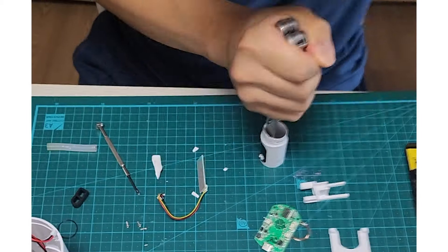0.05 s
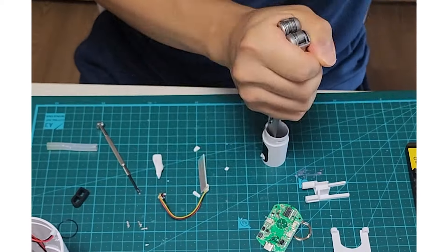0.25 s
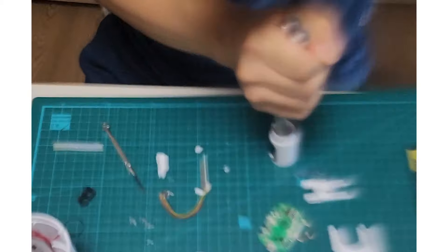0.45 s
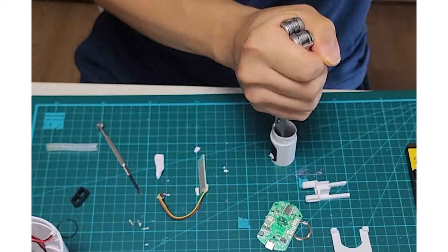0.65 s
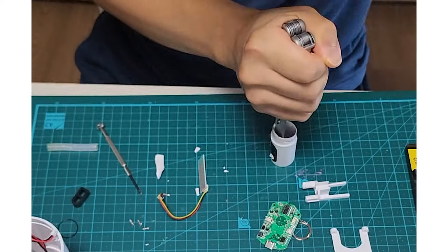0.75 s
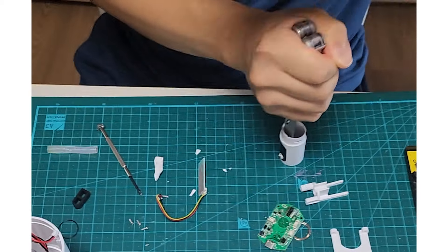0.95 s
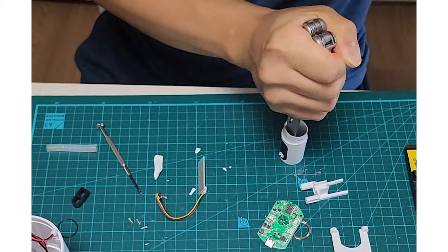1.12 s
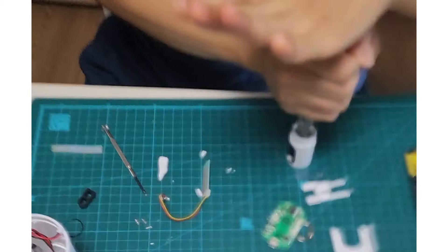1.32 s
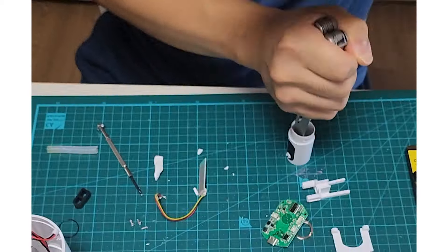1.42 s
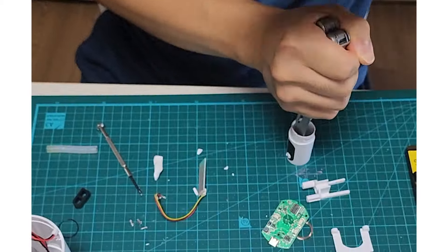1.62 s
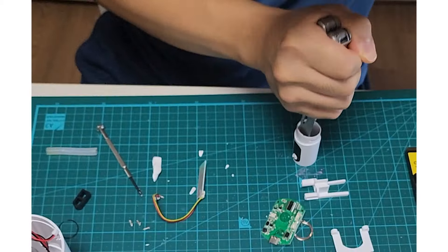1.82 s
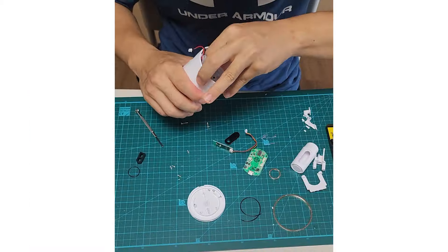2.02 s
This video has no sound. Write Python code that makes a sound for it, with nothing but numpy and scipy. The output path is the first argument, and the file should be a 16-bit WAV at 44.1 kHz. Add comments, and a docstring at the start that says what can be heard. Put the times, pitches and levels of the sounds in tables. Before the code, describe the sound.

A palm hammers five times, at an even pace, on a steel tool standing in a small plastic housing. Each blow combines a slap, a hollow knock, a deep desk thump and a crunchy snap of plastic, followed by a quick clatter of loose parts. Faint ticks fall between the later blows. Finally the background drops away and fingers briefly slide on plastic. The stereo microphone is close to the desk in a bare, echoing room.

```python
"""A bare, echoing room, stereo microphone close to a desk with a mat on it.
A palm hammers five times on a steel tool that stands in a small plastic housing on the mat.
Each blow slaps the handle, thumps the desk and cracks the plastic; tool and loose parts jump and
clatter down again. The recorder's limiter ducks under the thumps. At the end the room's sound
drops away and fingers slide on the plastic."""
import sys
import numpy as np
from scipy import signal
from scipy.fft import rfft, irfft, next_fast_len
from scipy.io import wavfile
from scipy.ndimage import uniform_filter1d, minimum_filter1d

SR = 44100
rng = np.random.default_rng(int(sys.argv[2]) if len(sys.argv) > 2 else 0)


def output_pcm(signal):
    """Save a mono or channel-first signal as 16-bit PCM at the path in sys.argv[1].

    Samples are clipped to [-1, 1] before scaling.
    """
    pcm = np.clip(np.atleast_2d(signal).T, -1, 1) * 32767
    wavfile.write(sys.argv[1], SR, np.round(pcm).astype(np.int16))


N = 91419
SCENE_S = np.arange(N) / SR
RING_S = np.arange(int(0.66 * SR)) / SR  # time axis of one ring or echo


def amp(db):
    """Decibels to gain."""
    return 10 ** (np.asarray(db) / 20)


def unit_rms(x):
    """The signal scaled to rms 1."""
    return x / np.sqrt(np.mean(x ** 2) + 1e-20)


def curve_at(points, hz):
    """Read (hz, value) points on a log frequency axis."""
    point_hz, values = np.transpose(points)
    return np.interp(np.log(hz + 1), np.log(point_hz + 1), values)


def add(track, start_s, sound):
    """Mix a sound into the track from start_s on."""
    start = round(start_s * SR)
    part = sound[..., max(-start, 0):max(track.shape[-1] - start, 0)]
    track[..., max(start, 0):max(start, 0) + part.shape[-1]] += part


# How alike the microphone's two sides are: frequency_hz, correlation
STEREO_LIKENESS = [(60, 0.99), (150, 1), (300, 0.95), (640, 0.73), (1400, 0.27), (16000, 0)]

def noise(size, spectrum=None, tilt=0):
    """Stereo noise of rms 1, alike in the bass and unrelated in the treble; tilt in dB per octave."""
    fft_size = next_fast_len(size)
    hz = np.fft.rfftfreq(fft_size, 1 / SR)
    spread = np.arccos(np.clip(curve_at(STEREO_LIKENESS, hz), -1, 1)) / 2
    colour = amp(curve_at(spectrum, hz) + tilt * np.log2(hz + 150)) if spectrum else 1
    white = rfft(rng.standard_normal((2, fft_size)))
    mid, side = irfft(white * colour * [np.cos(spread), np.sin(spread)], fft_size)[:, :size]
    return unit_rms(np.array([mid + side, mid - side]))


def burst(spectrum, tilt, t60_s, grain_db, rise_s):
    """A contact: dense, quickly damped ringing, broken into grains about a millisecond long."""
    t = RING_S[:SR // 10]
    grain_s = t[::SR // 1000]
    grains = unit_rms(amp(grain_db * np.interp(t, grain_s, rng.standard_normal(len(grain_s)))))
    envelope = amp(-60 * t / t60_s) * (1 - np.exp(-t / rise_s))
    return noise(len(t), spectrum, tilt) * grains * envelope


def ring(modes, attack_s):
    """Damped modes; heard away from the struck point, neighbours start in opposite directions."""
    swings = [(-1) ** k * amp(db - 60 * RING_S / t60_s) * np.sin(2 * np.pi * hz * RING_S)
              for k, (hz, db, t60_s) in enumerate(modes)]
    return -sum(swings) * (1 - np.exp(-RING_S / attack_s))


# How long the bare room echoes: frequency_hz, t60_s
ROOM_DECAY = [(80, 0.41), (210, 0.83), (560, 0.61), (1470, 0.55), (3880, 0.42), (10200, 0.42),
              (16000, 0.33)]
# Bands the room favours: frequency_hz, gain_db
ROOM_COLOUR = [(180, 0), (260, -31.5), (350, 1), (480, 4.5), (650, -4), (800, 8), (1000, 2), (1300, 0),
               (2000, -1), (16000, 0)]
# First wall reflection at the microphone: left_delay_s, right_delay_s, gain_db
WALL_REFLECTION = [(0.0124, .0146, -12.5)]

def in_room(sound, wet_db):
    """The direct sound, a wall reflection, and a diffuse tail whose treble dies first."""
    hz, t, bands = signal.stft(noise(len(RING_S)), SR, nperseg=512)
    fading = amp(curve_at(ROOM_COLOUR, hz)[:, None] - 60 * t / curve_at(ROOM_DECAY, hz)[:, None])
    tail = signal.istft(bands * fading, SR, nperseg=512)[1][:, :len(RING_S)]
    tail *= 1 + np.tanh((RING_S - 0.010) / 0.006)  # reflections take a moment to pile up
    response = amp(wet_db) * tail / np.linalg.norm(tail[0])
    response[:, 0] += 1  # direct path
    for left_s, right_s, db in WALL_REFLECTION:
        response[[0, 1], [round(left_s * SR), round(right_s * SR)]] += amp(db)
    return signal.fftconvolve(sound, response, axes=1)


# The five blows, close to the microphone:
# start_s, slap_db, knock_db, thump_db, boom_db, clack_db, bite_db, flight_s, clatter_db
PALM_BLOWS = [(-0.005, -11.5, -16, -2, -4, -13.5, -18, 0.04, -22),
              (0.4190, -15, -8, 6.5, 7, -9.5, -4.5, 0.053, -15),
              (0.8759, -5, -5.5, 8.5, 4.5, -13.5, -8.5, 0.049, -15),
              (1.3144, -7, -12, 5.5, 3, -11.5, -11.5, 0.053, -13.5),
              (1.7482, -10.5, -22, 7.5, -7.5, -15.5, -11.5, 0.052, -15.5)]
BLOW_S, SLAP_DB, KNOCK_DB, THUMP_DB, BOOM_DB, CLACK_DB, BITE_DB, FLIGHT_S, CLATTER_DB = zip(*PALM_BLOWS)
# Palm on the handle: frequency_hz, density_db
SLAP_SPECTRUM = [(100, -7), (400, 3), (900, -7.5), (1450, 6.5), (2000, -8.5), (3000, -6), (4600, -4.5),
                 (7300, -10.5), (11000, -18.5), (16000, -8.5)]
# The hollow housing under the tool: pitch_hz, level_db, t60_s
HOUSING_MODES = [(1414, -2.5, 0.021), (2880, -31, 0.013), (4600, -27, 0.0098)]

def palm_slaps():
    """The palm slaps the end of the tool, and the housing below gives a hollow knock."""
    out = np.zeros((2, N))
    knock = np.tile(ring(HOUSING_MODES, attack_s=0.0003)[:SR // 10], (2, 1))
    for start_s, slap_db, knock_db in zip(BLOW_S, SLAP_DB, KNOCK_DB):
        slap = burst(SLAP_SPECTRUM, tilt=-2.25, t60_s=0.027, grain_db=2, rise_s=0.00059)
        add(out, start_s, amp(slap_db) * in_room(slap, wet_db=-1))
        add(out, start_s, amp(knock_db) * in_room(knock, wet_db=-6.5))
    return out


# Standing waves of the room, heard at the desk: pitch_hz, level_db, t60_s
ROOM_MODES = [(123.6, -26, 0.47), (150.13, -22, 0.56), (166.5, -18, 0.36), (201.7, -33, 0.64),
              (346.3, -30, 0.62), (468, -42.5, 1), (574, -44.5, 0.75), (773, -40, 0.73), (822, -42, 0.94),
              (1200, -28, 0.51), (1375, -44, 0.32), (1580, -31, 0.31)]
# Woody clack of the desk board: frequency_hz, density_db
BOARD_SPECTRUM = [(120, -13), (220, 13.5), (340, 1), (460, 0.5), (570, 3), (800, -5), (1200, -7),
                  (2500, -16), (16000, -30)]

def thuds(hits, modes, attack_s, rumble_db, boom_delay_s=0.035, left_lag_s=0.00034):
    """Low knocks with a woody clack; each wakes the room's standing waves and a diffuse rumble."""
    thud = ring(modes, attack_s)
    boom = ring(ROOM_MODES, attack_s=0.0175)
    scatter_envelope = amp(-60 * RING_S / 0.5) * (1 - np.exp(-RING_S / 0.0011))
    out = np.zeros((2, N))
    for start_s, thud_db, boom_db, clack_db in hits:
        scatter = rng.standard_normal((2, len(RING_S))) * scatter_envelope
        rumble = signal.fftconvolve(thud[None], scatter / np.linalg.norm(scatter[0]), axes=1)
        clack = burst(BOARD_SPECTRUM, tilt=0, t60_s=0.075, grain_db=-0.5, rise_s=0.0012)
        add(out, start_s, amp(thud_db) * thud)
        add(out, start_s, amp(thud_db + rumble_db) * rumble)
        add(out, start_s, amp(clack_db) * in_room(clack, wet_db=-11))
        add(out[0], start_s + boom_delay_s + left_lag_s, amp(boom_db) * boom)
        add(out[1], start_s + boom_delay_s, amp(boom_db) * boom)
    return out


# The desk with its mat, from close by: pitch_hz, level_db, t60_s
DESK_MODES = [(34.1, -25.5, 0.53), (62.6, 0.5, 0.038), (145.2, -0.5, 0.057), (190.2, -11, 0.071)]

def desk_thumps():
    """The desk top gives under each blow."""
    hits = zip(BLOW_S, THUMP_DB, BOOM_DB, CLACK_DB)
    return thuds(hits, DESK_MODES, attack_s=0.00015, rumble_db=-18.5)


# The room's background at the microphone: frequency_hz, density_db
ROOM_NOISE_SPECTRUM = [(20, 9), (30, -1), (75, 3), (140, 3), (250, -6.5), (450, -20.5), (800, -11.5),
                       (1400, -25), (2500, -32), (5000, -32), (10000, -37), (16000, -67)]

def room_noise():
    """A quiet, steady noise, mostly bass."""
    return amp(-42) * noise(N, ROOM_NOISE_SPECTRUM)


# The housing splits, once per blow: start_s, level_db
HOUSING_SPLITS = [(0.0092, -10.5), (0.444, -10), (0.8997, -8.5), (1.3226, 1.5), (1.757, -4.5)]
# Splitting plastic, close up: frequency_hz, density_db
CRACK_SPECTRUM = [(200, 11), (800, 1.5), (2000, 6), (3500, 5.5), (5200, 0.5), (7300, 3), (10000, -5.5),
                  (16000, -7.5)]

def housing_cracks(bite_delay_s=0.0145):
    """Once the mat is pressed flat the tip bites with a crunch; the plastic splits in a bright snap."""
    out = np.zeros((2, N))
    for blow_s, db in zip(BLOW_S, BITE_DB):
        crunch = burst(CRACK_SPECTRUM, tilt=-1.7, t60_s=0.058, grain_db=5, rise_s=0.00057)
        add(out, blow_s + bite_delay_s, amp(db) * in_room(crunch, wet_db=-3))
    for start_s, db in HOUSING_SPLITS:
        snap = burst(CRACK_SPECTRUM, tilt=5.2, t60_s=0.0089, grain_db=4, rise_s=0.0001)
        add(out, start_s, amp(db) * in_room(snap, wet_db=-1))
    return out


# Pieces ringing on the desk: start_s, pitch_hz, level_db, t60_s
PIECE_PINGS = [(0.034, 2170, -10, 0.015), (0.891, 2152, -6.5, 0.024), (1.588, 3910, -39.5, 0.046)]

def pings():
    """A jolted piece rings briefly at one pitch."""
    out = np.zeros((2, N))
    for start_s, hz, db, t60_s in PIECE_PINGS:
        ping = ring([(hz, db, t60_s)], attack_s=0.0015)[:SR // 10]
        add(out, start_s, in_room(np.tile(ping, (2, 1)), wet_db=-4))
    return out


# Small parts landing on the mat: frequency_hz, density_db
PARTS_SPECTRUM = [(150, 2), (400, -58), (650, -21), (900, -7.5), (1300, 3), (2300, 3.5), (3400, 3),
                  (5200, 0), (7200, -2.5), (9000, -6.5), (12000, -8), (16000, -11)]

def clatter(contacts=4, first_gap_s=0.01, gap_ratio=0.7, step_db=0.59):
    """Thrown-up parts land and chatter, each contact sooner, shorter, brighter and peaking higher."""
    out = np.zeros((2, N))
    for contact_s, db in zip(np.add(BLOW_S, FLIGHT_S), CLATTER_DB):
        for k in range(contacts):
            tilt = -1.25 + 1.52 * k
            t60_s = 0.062 * 0.61 ** k
            contact = burst(PARTS_SPECTRUM, tilt, t60_s, grain_db=0, rise_s=0.00054)
            add(out, contact_s, amp(db + k * step_db) * in_room(contact, wet_db=0))
            contact_s += first_gap_s * gap_ratio ** k
    return out


# Thuds just after the first three blows: start_s, thud_db, boom_db, clack_db
AFTER_THUDS = [(0.0603, -22, -21, -39), (0.4735, 0.5, -0.5, -24.5), (0.9248, 6, -16, -16.5),
               (0.9412, 2, -20, -13)]
# Low, short ring of the second thud that follows a blow: pitch_hz, level_db, t60_s
AFTER_THUD_MODES = [(153, -3, 0.062), (212.5, -8.5, 0.062), (325, -2.5, 0.021)]

def after_thuds():
    """A second thud with a softer onset follows close behind a blow."""
    return thuds(AFTER_THUDS, AFTER_THUD_MODES, attack_s=0.003, rumble_db=-15.5)


def friction(levels, spectrum):
    """Soft rubbing noise that follows a (time_s, level_db) curve and is silent outside it."""
    time_s, db = np.transpose(levels)
    return amp(np.interp(SCENE_S, time_s, db, left=-120, right=-120)) * noise(N, spectrum)


# The arm's swing near the microphone: time_s, level_db
ARM_SWING = [(0.1, -56), (0.25, -46), (0.38, -45.5), (0.43, -40)]
# Swish of the sleeve: frequency_hz, density_db
SLEEVE_SPECTRUM = [(150, -6), (450, -0.5), (1000, -11), (2000, -21), (5000, -42), (16000, -39)]

def sleeve_swish():
    """The sleeve rubs as the arm is raised and brought down for the second blow."""
    return friction(ARM_SWING, SLEEVE_SPECTRUM)


# Ticks between the later blows: start_s, level_db
STRAIN_TICKS = [(1.1030, -22.5), (1.1568, -29.5), (1.1860, -33.5), (1.5870, -35)]
# One tick of the plastic: frequency_hz, density_db
TICK_SPECTRUM = [(500, -24), (1500, -3), (2300, 7.5), (4000, -1.5), (5800, -1), (8000, -10.5), (16000, -33)]

def housing_ticks():
    """The strained housing ticks under the resting tool."""
    out = np.zeros((2, N))
    for start_s, db in STRAIN_TICKS:
        tick = burst(TICK_SPECTRUM, tilt=0, t60_s=0.017, grain_db=-1.5, rise_s=0.00049)
        add(out, start_s, amp(db) * in_room(tick, wet_db=-4))
    return out


# The closing slide of the fingers, close and dry: time_s, level_db
FINGER_SLIDE = [(2.014, -64.5), (2.035, -47), (2.055, -43.5), (2.1, -28)]
# Fingers on plastic: frequency_hz, density_db
FINGER_SPECTRUM = [(59, -45), (100, -4), (481, -0.5), (768, -5), (1310, -6), (1760, -8), (2320, -12),
                   (12700, -39), (16000, -53)]

def finger_slide():
    """Fingers slide on the plastic with a swelling rub."""
    return friction(FINGER_SLIDE, FINGER_SPECTRUM)


def scene(hush_s=2.013):
    """Hammering over room noise; both drop abruptly at hush_s, and the fingers take over."""
    hammering = desk_thumps() + after_thuds() + palm_slaps() + housing_cracks()
    hammering += housing_ticks() + clatter() + pings() + sleeve_swish()
    hush_db = np.interp(SCENE_S, [hush_s, hush_s + 0.0034], [0, -13])
    return amp(hush_db) * (hammering + room_noise()) + finger_slide()


def record(dry, ceiling=1.0, hold_s=0.0064, top_hz=15900):
    """The recorder's fast limiter ducks under the peaks, and a low-pass cuts the top treble."""
    width = int(hold_s * SR)
    needed_gain = np.minimum(1, ceiling / (np.abs(dry).max(axis=0) + 1e-9))
    limited = dry * uniform_filter1d(minimum_filter1d(needed_gain, width), width)
    low_pass = signal.firwin(161, top_hz, window="blackman", fs=SR)
    return signal.fftconvolve(limited, low_pass[None], mode="same", axes=1)


dry = scene()
out = record(dry)
output_pcm(out)
```